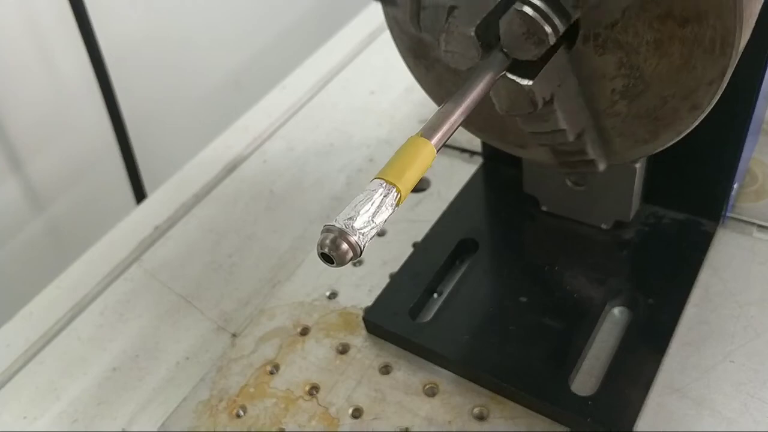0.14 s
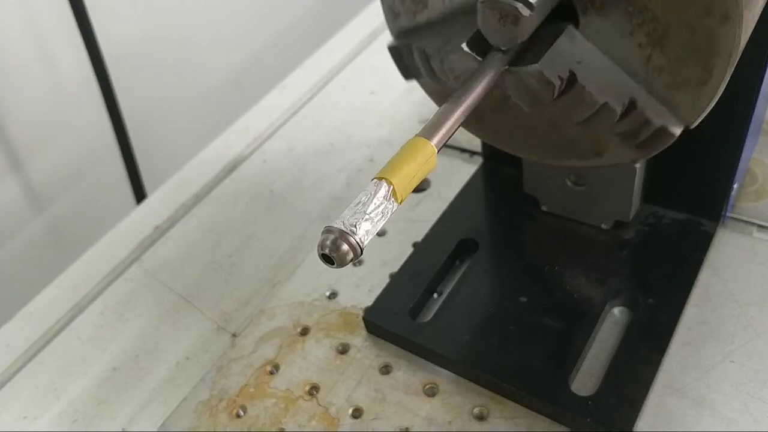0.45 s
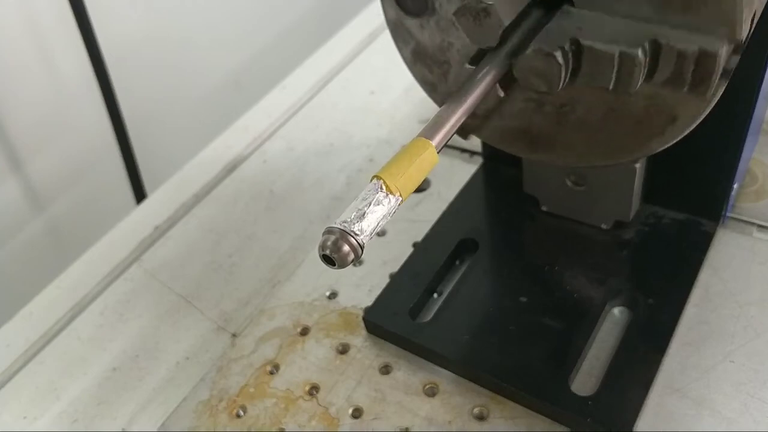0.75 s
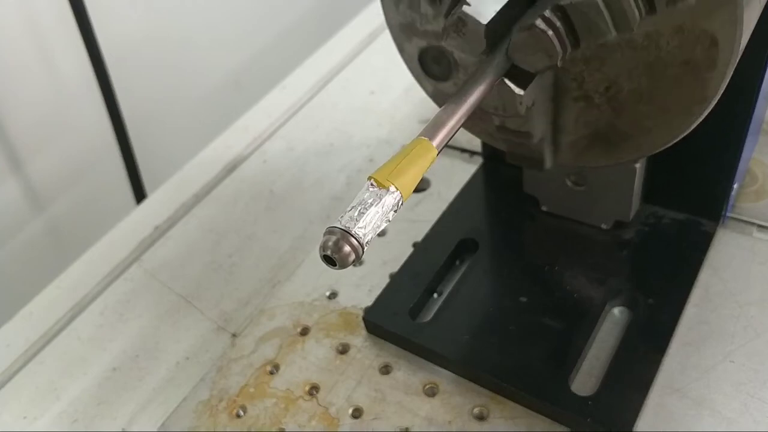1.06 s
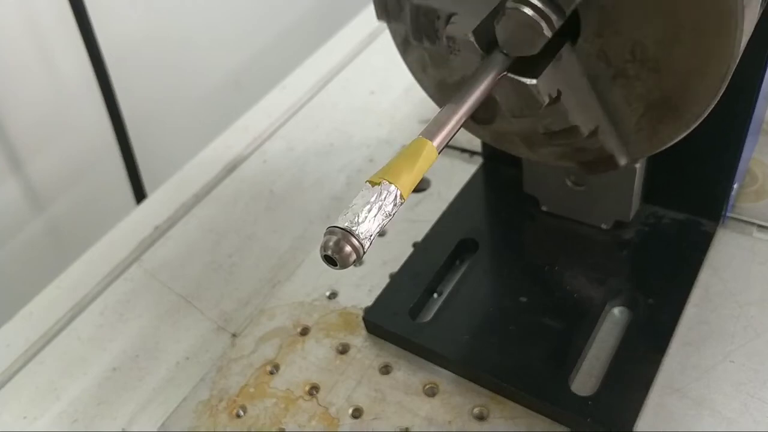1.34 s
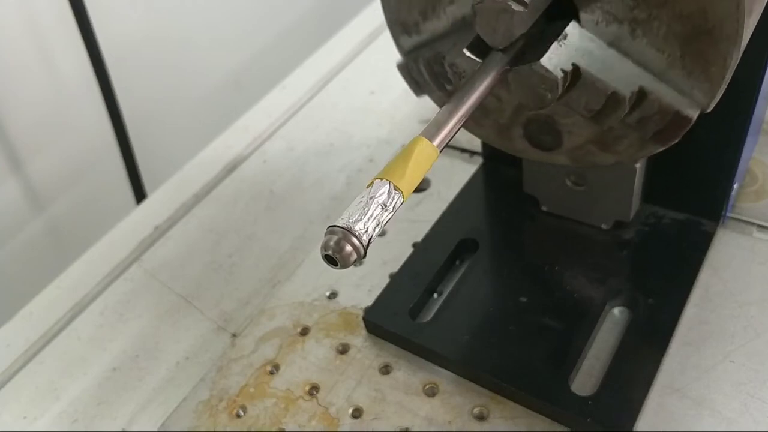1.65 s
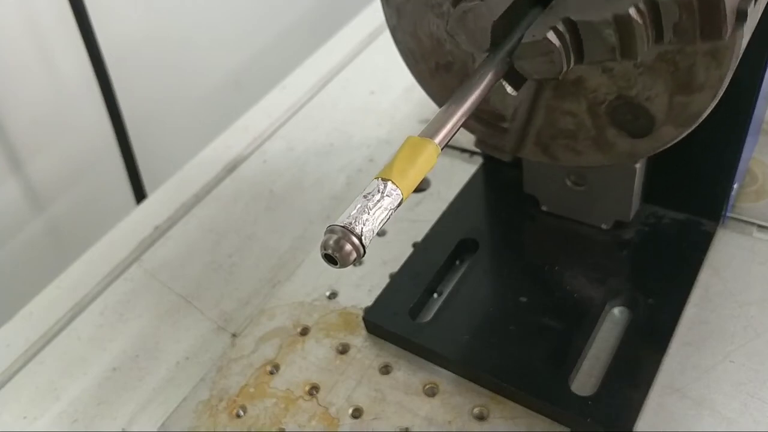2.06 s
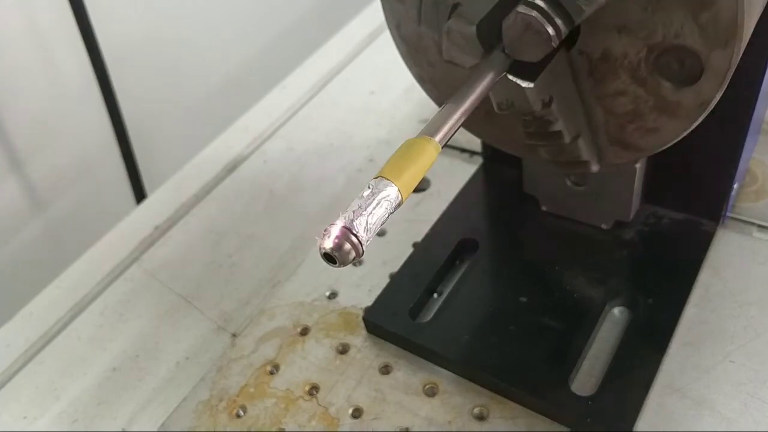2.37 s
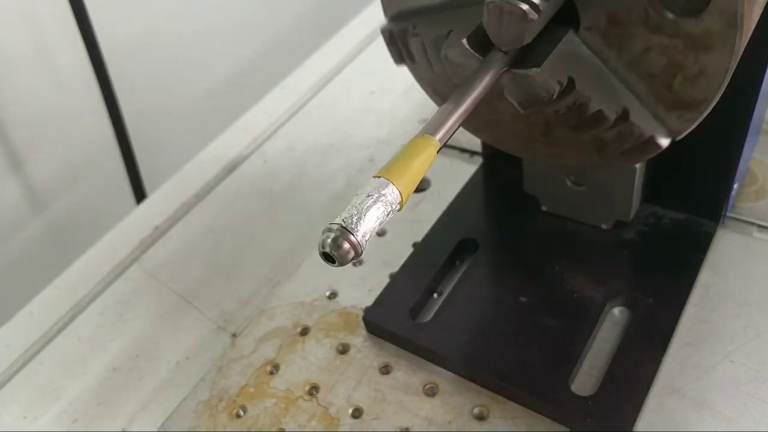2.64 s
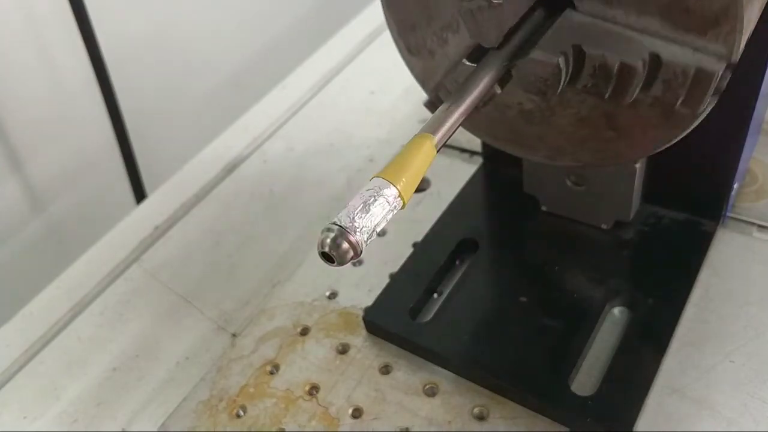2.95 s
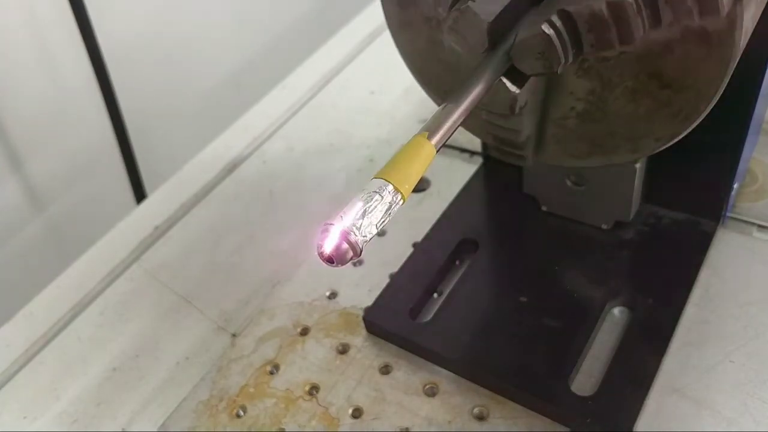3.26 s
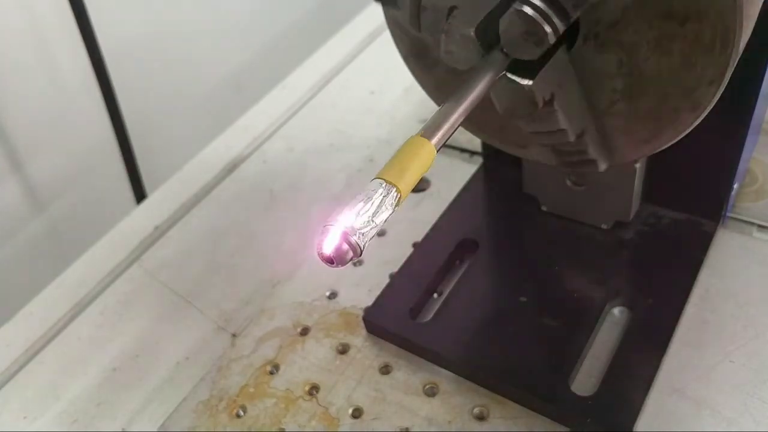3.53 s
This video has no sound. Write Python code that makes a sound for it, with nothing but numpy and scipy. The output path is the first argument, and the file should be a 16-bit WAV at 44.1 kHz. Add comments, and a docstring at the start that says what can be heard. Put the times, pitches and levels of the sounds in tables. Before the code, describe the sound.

A laser cleaning machine's fan hums and rushes steadily, heard close in a workshop. The beam then hits a turning metal part with a sharp sizzle, followed by quick crackling snaps over faint chirps and a low rumble.

```python
"""Workshop, close to a laser cleaning machine, one microphone, only a short tail off the room.
The cooling fan hums and rushes throughout. About two seconds in, the beam lands on a turning metal
part and the coating burns off in a burst of sizzle. The scan pattern then repeats about nine times a
second, spitting up to three snaps each time as it crosses dirt, while the scan mirrors chirp and rumble."""
import sys
import numpy as np
from scipy import signal
from scipy.fft import rfft, irfft
from scipy.io import wavfile

SR = 44100
rng = np.random.default_rng(int(sys.argv[2]) if len(sys.argv) > 2 else 0)


def put_to_file(sound):
    """Save the sound as 16-bit audio at rate SR, in the file named by the first command-line argument."""
    columns = np.atleast_2d(sound).T  # one column per channel
    safe = np.clip(columns, -1, 1)
    whole_steps = np.round(safe * 32767)
    wavfile.write(sys.argv[1], SR, whole_steps.astype(np.int16))


N = 163170
TIME = np.arange(N) / SR
LASER_ON_S, STROKES_PER_S = 2.169, 100.2

# Colour of the air rushing through the fan: f/Hz, relative level/dB
AIR_SPECTRUM = [(30, -75), (80, -38.5), (130, -20), (170, -18), (215, -1.5), (320, 3.5), (480, -8),
                (720, -0.5), (840, -5.5), (1030, -4), (1400, -10), (1750, -22), (2270, -11.5),
                (2650, -23.5), (3200, -17.5), (3850, -19.5), (4300, -22), (5700, -24), (6100, -25.5),
                (6750, -26), (7100, -30), (7450, -23), (8350, -23.5), (9100, -12.5), (9800, -26),
                (10050, -23.5), (10600, -55.5)]
# Thin fan and motor tones: f/Hz, level/dB before the air gain
MOTOR_TONES = [(199.5, -49), (699.8, -44.5), (2837, -59.5), (3226, -55), (3812, -56), (4797, -60),
               (5949, -60.5), (6051, -61), (6139, -59.5), (6907, -64)]
# Course of the fan's loudness: t/s, hum level/dB, air gain/dB
FAN_LEVELS = [(.3, -22.5, 0), (1.4, -22.5, 1.03), (2.1, -23.5, -.5), (2.5, -25, -0.5), (3.0, -22.5, -1.5),
              (3.3, -27, -3), (3.7, -25.5, -4.5)]
# Brief dips and swells of the hum: t/s, change/share of its amplitude
HUM_WOBBLES = [(2.237, 0.26), (2.275, -0.38), (2.325, -0.25), (2.357, 0.23), (2.405, -0.15), (2.472, 0.28),
               (2.578, 0.6), (2.625, -0.11), (2.688, -0.64), (2.772, 0.48), (2.803, -1.06), (2.878, 0.22),
               (2.937, -0.63), (3.017, -1.07), (3.454, -0.48), (3.673, -0.74)]
# Colour of the running scan head: f/Hz, relative level/dB
RUMBLE_SPECTRUM = [(25, -36), (80, -34), (130, -21.5), (185, 2), (225, 3), (280, 5.5), (345, 8),
                   (420, -18.5), (900, -42.5)]
# Colour of the coating burning off: f/Hz, relative level/dB
BURST_SPECTRUM = [(100, -37), (400, -23), (1850, -12), (2100, -0.5), (2380, -1), (2620, -16), (3400, -6.5),
                  (4350, -10.5), (5200, -5.5), (5850, 2), (6200, -3), (6700, 1.5), (7200, -5), (7600, -2),
                  (9100, -0.5), (9900, -13), (11400, -36)]
# The beam crossing dirt: t/s, relative crack level/dB, relative sizzle level/dB
DIRT_SNAPS = [(2.2336, -21, -27), (2.262, -29.5, -33), (2.2906, -28.5, -31), (2.329, -27, -30),
              (2.3562, -27.5, -24), (2.386, -22, -30), (2.439, -25.5, -27.5), (2.4677, -32, -34.5),
              (2.4966, -32.5, -33.5), (2.5482, -26, -31), (2.5773, -31, -33), (2.6061, -36.5, -26.5),
              (2.6582, -26, -28.5), (2.6843, -32, -32), (2.7144, -36, -32), (2.766, -28, -32),
              (2.795, -33, -34), (2.8238, -40, -34), (2.8744, -31, -32), (2.904, -41, -33),
              (2.9327, -34, -29.5), (2.9842, -27.5, -30), (3.043, -40, -31.5), (3.0948, -30, -37.5),
              (3.151, -39, -31), (3.204, -31.5, -33.5), (3.313, -31.5, -32.5), (3.421, -30, -36),
              (3.4512, -37, -30), (3.4792, -44, -32.5), (3.5313, -35, -36), (3.6401, -36, -34.5)]
# Colour of a snap's crack: f/Hz, relative level/dB
CRACK_SPECTRUM = [(60, -26), (380, 4.5), (1250, 5.5), (1850, -1.5), (2280, 7.5), (2800, -7), (3350, 3.5),
                  (3880, 5), (4280, -8), (4650, -3.5), (5300, -4.5), (6500, -25)]
# Colour of a snap's high sizzle: f/Hz, relative level/dB
SIZZLE_SPECTRUM = [(3000, -24), (5000, -0.5), (5500, -16.5), (5950, 3.5), (6180, -13), (6470, 6),
                   (6950, -12), (7350, -1.5), (8000, -1), (8300, -1.5), (9350, 4), (10200, -6.5),
                   (11000, -36), (12000, -57)]
# Hard sparks within the sharpest snaps: t/s, level/dB, centre f/Hz before colouring
SPARK_TICKS = [(2.235, -16.5, 1470), (2.3574, -18, 9800), (2.3867, -20, 750), (2.5462, -17, 8000),
               (2.6027, -23.5, 7500), (2.6561, -16.5, 5300), (2.686, -23, 6500), (2.7149, -30, 7000),
               (2.8758, -28, 5000), (2.9868, -19, 2820), (3.1522, -22, 9200), (3.2035, -30, 2800),
               (3.3106, -26.5, 8000), (3.4492, -23.5, 4500), (3.4788, -28, 4000)]


def amp(db):
    """Decibels to gain."""
    return 10 ** (np.asarray(db) / 20)


def unit(x):
    """Scales to rms 1."""
    return x / np.sqrt(np.mean(x ** 2) + 1e-20)


def colour(x, spectrum):
    """Filters causally by a spectrum (f/Hz, level/dB), keeping the power of white noise."""
    hz, db = np.transpose(spectrum)
    f = abs(np.fft.fftfreq(8192, 1 / SR))
    rolloff_db = 60 * np.log2(np.maximum(f / hz[-1], 1))
    shape_db = np.interp(np.log(f + 1), np.log(hz), db) - rolloff_db
    gain = unit(amp(np.maximum(shape_db, -90)))
    minimum_phase = np.exp(np.conj(signal.hilbert(np.log(gain))))
    taps = np.fft.ifft(minimum_phase).real
    return signal.fftconvolve(x, taps[:len(taps) // 2])[:N]


def drift(rate_hz):
    """Slow random motion of rms 1."""
    lowpass = 1 / (1 + (np.fft.rfftfreq(N, 1 / SR) / rate_hz) ** 2)
    return unit(irfft(rfft(rng.standard_normal(N)) * lowpass, N))


def grains(per_s=16000, spread_db=2):
    """A dense train of tiny pops of uneven size."""
    size = amp(spread_db * rng.standard_normal(N)) * rng.choice([-1, 1], N)
    return unit(size * (rng.random(N) < per_s / SR))


def patchy(x, patch_hz=70, patch_s=0.0099):
    """Lets small patches of the spectrum swell and fade at random, less so in the treble."""
    hz, t, bins = signal.stft(x, SR, nperseg=1024, noverlap=768)
    across = np.fft.fftfreq(len(hz), hz[1])[:, None] * patch_hz
    along = np.fft.fftfreq(len(t), t[1]) * patch_s
    blur = np.exp(-2 * np.pi ** 2 * (across ** 2 + along ** 2))
    patches = unit(np.fft.ifft2(np.fft.fft2(rng.standard_normal(bins.shape)) * blur).real)
    depth_db = 2.5 / np.hypot(1, hz[:, None] / 2500)
    return unit(signal.istft(bins * amp(depth_db * patches), nperseg=1024, noverlap=768)[1][:N])


def room(x, t60_s=0.05, first_echo_s=0.004, level_db=-15):
    """Scattered workshop reflections reach the microphone just behind the direct sound."""
    t = TIME[:SR // 2]
    echoes = rng.standard_normal(len(t)) * (rng.random(len(t)) < 0.1)
    taps = echoes * (t > first_echo_s) * amp(-60 * t / t60_s)
    return amp(level_db) * signal.fftconvolve(x, taps / np.linalg.norm(taps))[:N]


def blade_hum(hz=296.2, wander_hz=0.41, wobble_s=0.011):
    """The fan blades hum on one pitch; the level flutters more and wobbles while the laser fires."""
    turns = np.cumsum(hz + wander_hz * drift(rate_hz=3.4)) / SR
    hum = np.sqrt(2) * np.sin(2 * np.pi * turns) * (1 + 0.035 * drift(rate_hz=9.8))
    firing = np.clip((TIME - LASER_ON_S) / wobble_s, 0, 1)
    hum *= 1 + 0.13 * firing * drift(rate_hz=23)
    for at, change in HUM_WOBBLES:
        hum *= 1 + change * np.exp(-((TIME - at) / wobble_s) ** 2)
    return hum


def fan():
    """The cooling fan is the bed of the scene: blade hum, rushing air and thin motor tones."""
    hum = blade_hum()
    rush_db = -32 + 0.55 * drift(rate_hz=24)
    air = amp(rush_db) * colour(patchy(rng.standard_normal(N)), AIR_SPECTRUM)
    tones = np.zeros(N)
    for hz, db in MOTOR_TONES:
        turns = np.cumsum(hz * (1 + 0.00141 * drift(rate_hz=11.6))) / SR
        flutter = 1 + 0.35 * drift(rate_hz=11)
        tones += amp(db) * unit(np.sin(2 * np.pi * turns) * flutter)
    t, hum_db, air_db = np.transpose(FAN_LEVELS)
    return hum * amp(np.interp(TIME, t, hum_db)) + (air + tones) * amp(np.interp(TIME, t, air_db))


def scan_head(settle_db_per_s=2.5, drone_hz=201, drone_db=-45.5):
    """The scan head runs with an uneven rumble that slowly settles, and a faint wavering drone."""
    settled_db = settle_db_per_s * np.maximum(TIME - LASER_ON_S, 0)
    rumble_db = -35 - settled_db + 2 * drift(rate_hz=5)
    rumble = amp(rumble_db) * colour(rng.standard_normal(N), RUMBLE_SPECTRUM)
    drone = amp(drone_db) * unit(np.sin(2 * np.pi * drone_hz * TIME + 0.5 * drift(rate_hz=6.6)))
    return rumble + drone * (1 + 0.35 * drift(rate_hz=6.5))


def mirrors(level_db=-45, chirp_s=0.0015, glide_hz_per_s=380000, echo_s=0.0036, jitter_s=0.0003):
    """The scan mirrors give a gliding chirp and its close echo at each stroke, loudest around snaps."""
    out = np.zeros(N)
    loudest_s = np.array(DIRT_SNAPS)[:, 0] + 0.0022  # just after each snap
    for at in np.arange(LASER_ON_S, N / SR, 1 / STROKES_PER_S):
        detune, stroke_db, late, direction = rng.standard_normal(4)
        hz = 7910 + 180 * detune
        gap_s = abs(at - loudest_s).min()
        strength = amp(stroke_db) * (0.7 + np.exp(-(gap_s / 0.0057) ** 2))
        near = abs(TIME - at) < 0.01
        for delay in 0, echo_s:
            age = TIME[near] - at - delay - jitter_s * late
            turns = hz * age + np.sign(direction) * glide_hz_per_s * age ** 2 / 2
            out[near] += strength * np.exp(-(age / chirp_s) ** 2) * np.sin(2 * np.pi * turns)
    return amp(level_db) * out / np.std(out[TIME > LASER_ON_S])


def coating_burst(gain_db=-23.5, rise_s=0.009, hold_s=0.029, repeat_share=0.15):
    """The coating flares into a sizzle that drops quickly, then lingers; repeating strokes make it buzz."""
    age = np.maximum(TIME - LASER_ON_S, 0)
    flare = amp(-323 * np.maximum(age - hold_s, 0))  # flare and tail fall in dB/s
    tail = amp(1 - 96 * age)
    envelope = np.minimum(age / rise_s, 1) * np.hypot(flare, tail)
    period = round(SR / STROKES_PER_S)
    stroke = unit(irfft(np.exp(2j * np.pi * rng.random(period // 2 + 1)), period))
    pops = np.sqrt(repeat_share) * np.resize(stroke, N) + np.sqrt(1 - repeat_share) * grains()
    return amp(gain_db) * colour(pops * envelope, BURST_SPECTRUM)


def swell(age, rise_s, fall_s):
    """Exponential rise and fall, peaking at age 0."""
    return np.exp(np.minimum(age / rise_s, -age / fall_s))


def dirt_snaps(running, fry_db=-49.5, crack_gain_db=5.5, sizzle_gain_db=4.5):
    """Each time the beam crosses dirt, pops swell briefly over a faint steady frying."""
    crack_power, sizzle_power = np.zeros(N), running * amp(fry_db) ** 2
    for at, crack_db, sizzle_db in DIRT_SNAPS:
        near = abs(TIME - at) < 0.05
        age = TIME[near] - at
        core = swell(age, rise_s=0.0005, fall_s=0.0017)
        skirt = 0.26 * swell(age, rise_s=0.0038, fall_s=0.006)
        power = core ** 2 + skirt ** 2
        crack_power[near] += power * amp(crack_db + crack_gain_db) ** 2
        sizzle_power[near] += power * amp(sizzle_db + sizzle_gain_db) ** 2
    crack = colour(grains() * np.sqrt(crack_power), CRACK_SPECTRUM)
    sizzle = colour(grains() * np.sqrt(sizzle_power), SIZZLE_SPECTRUM)
    return crack + sizzle


def sparks(tick_s=0.00028, width_octaves=0.8):
    """Each spark is one hard tick, ringing with the colours of crack and sizzle."""
    out = np.zeros(N)
    age = TIME[:512] - TIME[256]
    f = np.fft.rfftfreq(len(age), 1 / SR)
    for at, db, hz in SPARK_TICKS:
        band = np.exp(-(np.log2((f + 1) / hz) / width_octaves) ** 2)
        noise = irfft(band * np.exp(2j * np.pi * rng.random(len(band))))
        tick = noise * swell(age, tick_s, tick_s)
        ring = colour(tick, CRACK_SPECTRUM) + colour(tick, SIZZLE_SPECTRUM)
        ring *= np.sqrt(2 * tick_s * SR / np.sum(ring ** 2))  # energy of rms 1 over 2 * tick_s
        start = round((at + age[0]) * SR)
        out[start:start + len(ring)] += amp(db) * ring
    return out


def scene():
    """At the microphone: the fan throughout, laser and scan head once the beam is on."""
    running = np.clip((TIME - LASER_ON_S) / 0.04, 0, 1)
    laser = coating_burst() + dirt_snaps(running) + sparks() + mirrors()
    return (fan() + running * scan_head() + laser + room(laser))[None]


def record(dry):
    """The mono channel fades in quickly and loses its top treble."""
    silent_until_s, full_at_s, cutoff_hz = 0.12, 0.31, 11100
    fade = np.clip((TIME - silent_until_s) / (full_at_s - silent_until_s), 0, 1) ** 1.37
    lowpass = signal.firwin(255, cutoff_hz, window=("kaiser", 9), fs=SR)
    return signal.oaconvolve(dry * fade, lowpass[None], "same")


dry = scene()
out = record(dry)
put_to_file(out)
```